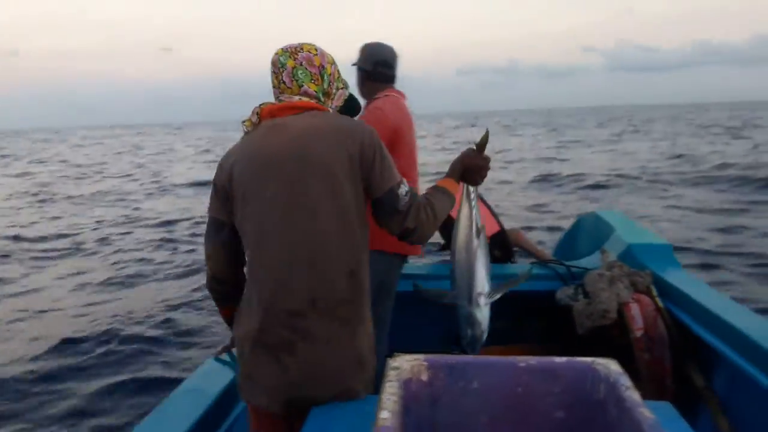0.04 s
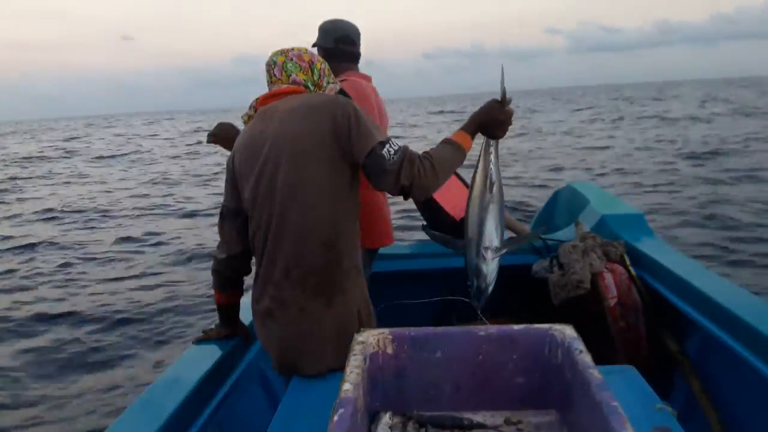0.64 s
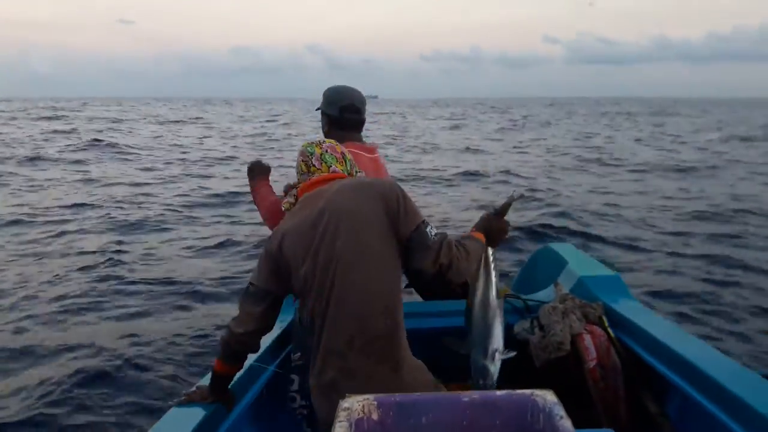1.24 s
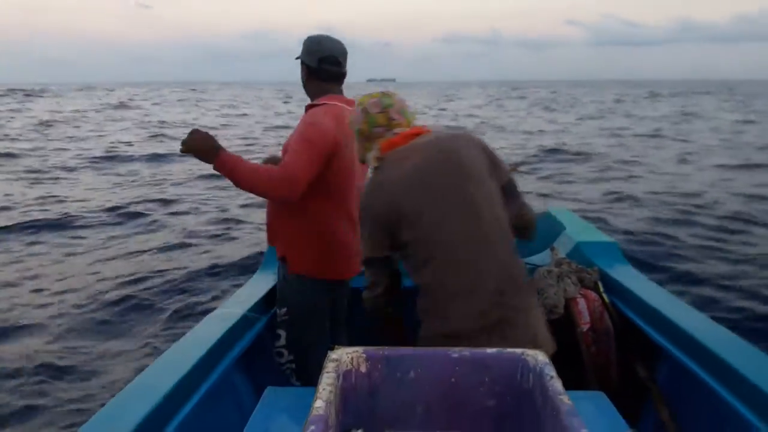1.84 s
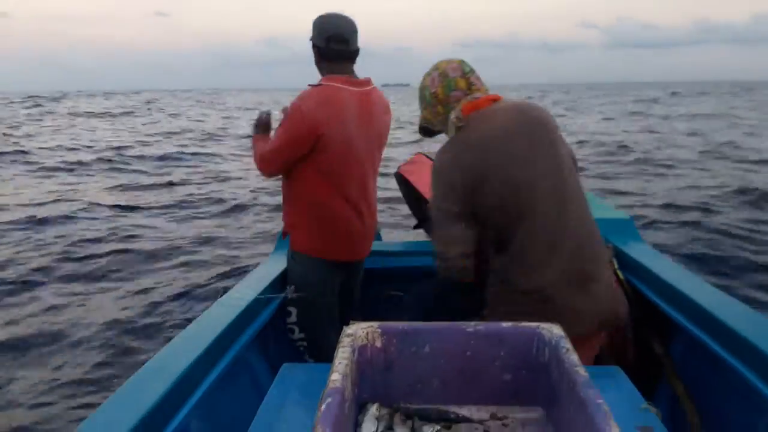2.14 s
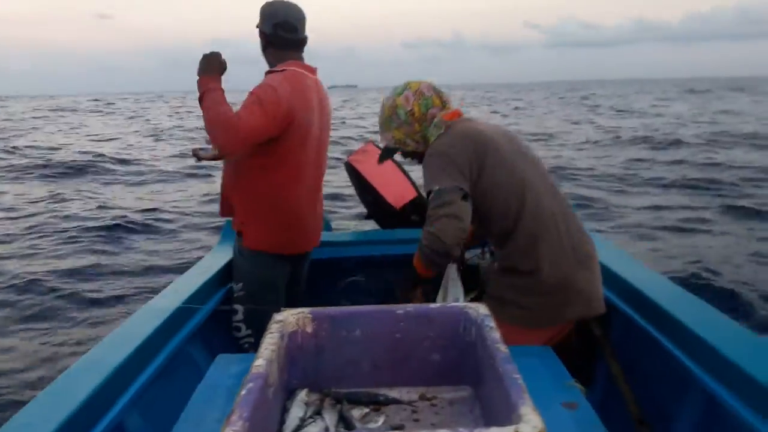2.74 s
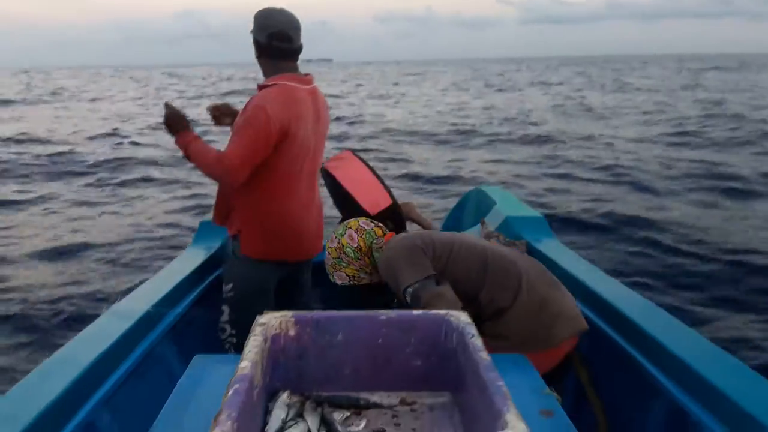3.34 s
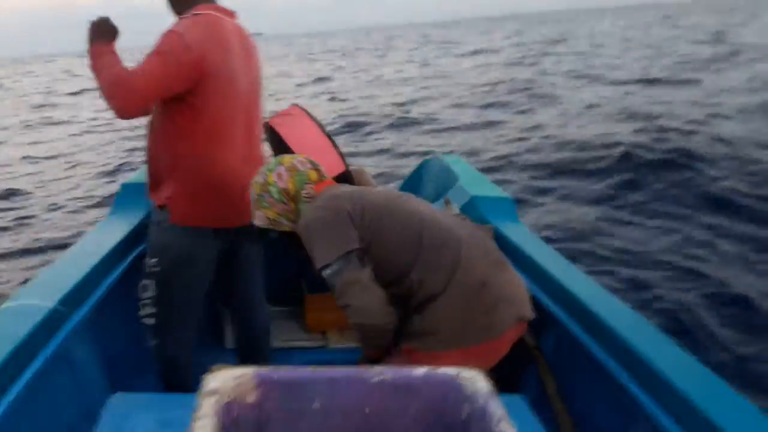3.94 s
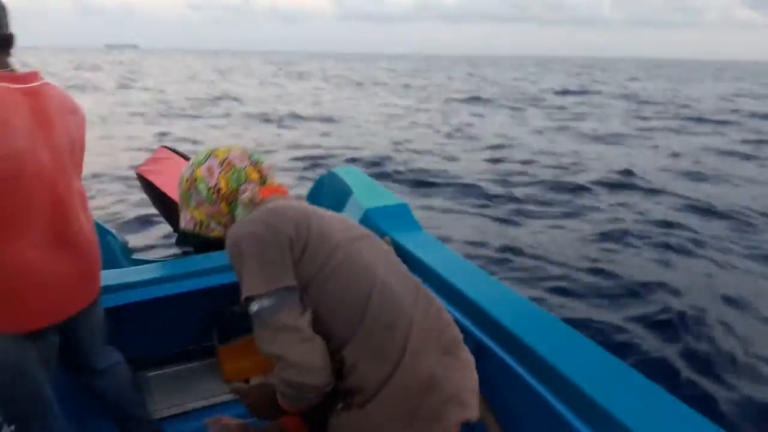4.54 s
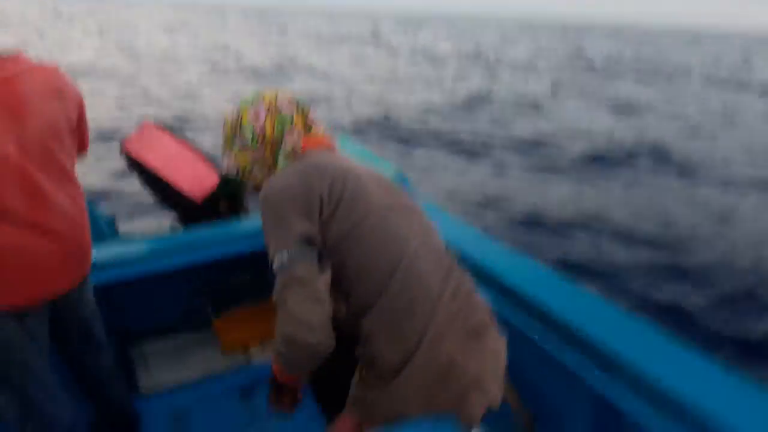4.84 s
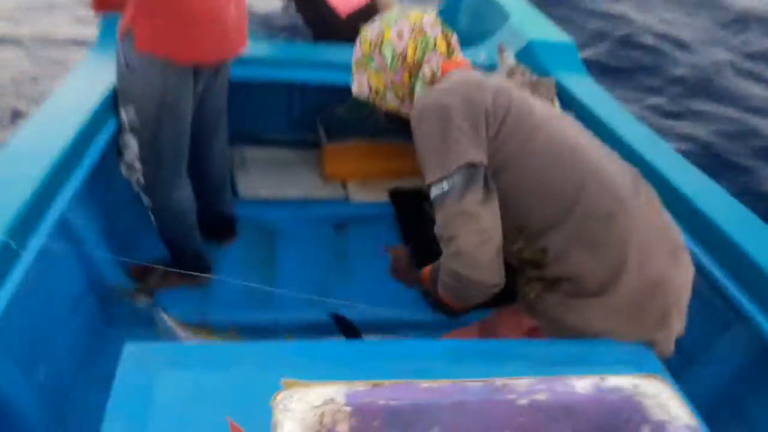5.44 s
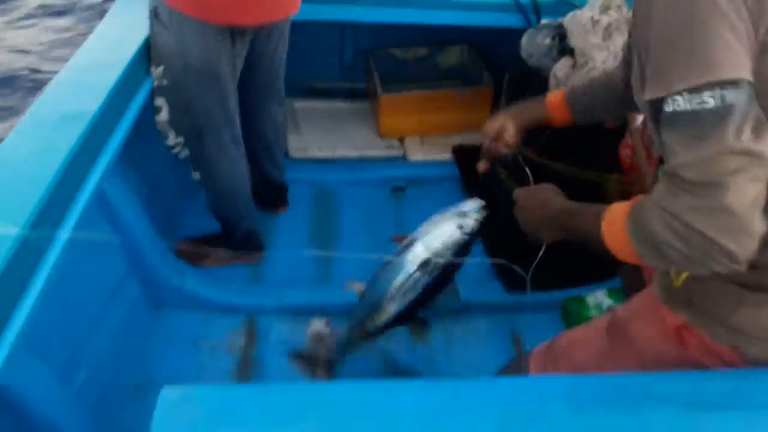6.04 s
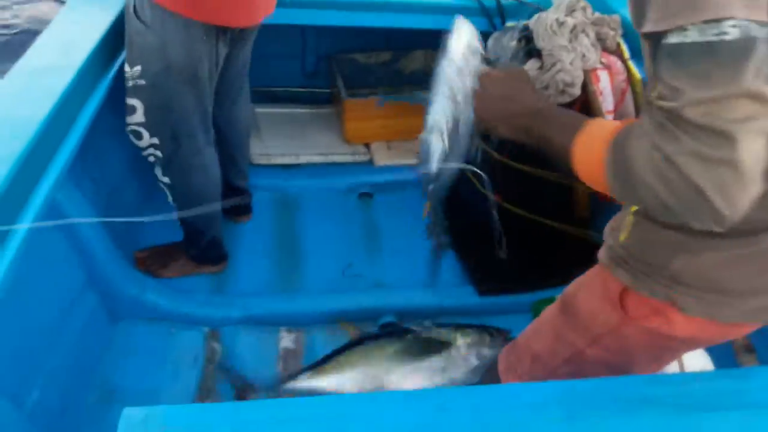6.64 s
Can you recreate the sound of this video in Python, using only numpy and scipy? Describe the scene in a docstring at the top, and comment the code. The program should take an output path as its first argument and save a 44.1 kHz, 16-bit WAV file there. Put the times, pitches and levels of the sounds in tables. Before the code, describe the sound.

Heard from inside a small boat, gusts of wind rumble over gentle sloshing and little bubbling plips. Feet and gear bump the hull now and then, among light wet pats. Past the midpoint the water washes louder and a landed fish thrashes on the floor nearby, its tail cracking in rapid, uneven wet slaps to the end. Its skin squeaks once against the deck.

```python
"""A freshly landed tuna thrashes on the wet fibreglass floor of a small open boat at sea.
Each tail impact cracks the water film and drives the deck; once, the skin squeaks by stick-slip friction.
Feet and gear knock on the hull, whose panels ring in their damped modes. Around the boat wind buffets
low, water sloshes, washes and fizzes along the side, and trapped air resonates in gulps and plips."""
import sys
import numpy as np
from scipy import signal
from scipy.fft import rfft, irfft, next_fast_len
from scipy.io import wavfile
from scipy.ndimage import uniform_filter1d

SR = 44100
rng = np.random.default_rng(int(sys.argv[2]) if len(sys.argv) > 2 else 0)


def generate_wav(sig):
    """Save sig (samples, or channels by samples) to the path in sys.argv[1] as 16-bit PCM at SR."""
    pcm = np.round(np.clip(np.atleast_2d(sig).T, -1, 1) * 32767).astype(np.int16)
    wavfile.write(sys.argv[1], SR, pcm)


N = 294317


def gain_of(db):
    """Amplitude ratio of a level in decibels."""
    return 10 ** (np.asarray(db) / 20)

def unit_rms(x):
    """Normalisation to rms 1."""
    return x / np.sqrt(np.mean(x ** 2) + 1e-20)

def envelope(curve):
    """A gain for every sample, interpolated in dB between (seconds, dB) points."""
    return gain_of(np.interp(np.arange(N) / SR, *np.transpose(curve)))

def spectrum_db(spectrum, hz):
    """A spectrum's level, interpolated along a logarithmic frequency axis."""
    corner_hz, db = np.transpose(spectrum)
    return np.interp(np.log(hz + 1), np.log(corner_hz + 1), db)

def add(mix, start_s, sound):
    """Superposition: a sound sums into the mix from its start time."""
    part = mix[max(round(start_s * SR), 0):][:len(sound)]
    part += sound[:len(part)]

def coloured(x, spectrum):
    """Filtering by multiplication of spectra; the result has rms 1."""
    n = next_fast_len(len(x), True)
    response = gain_of(spectrum_db(spectrum, np.fft.rfftfreq(n, 1 / SR)))
    return unit_rms(irfft(rfft(x, n) * response, n)[:len(x)])

def bell(detuning):
    """Lorentzian curve: 1 at the centre, one half at a detuning of 1."""
    return 1 / (1 + detuning ** 2)

def burst(noise, shape):
    """Amplitude-modulated noise carrying just the energy of its envelope."""
    return unit_rms(noise * shape) * np.sqrt(np.mean(shape ** 2))

def patchy_noise(spectrum, patch_db, flicker_db, patch_bins, patch_frames):
    """Random modulation in time and frequency breaks noise into short bright and dark patches."""
    hz = np.fft.rfftfreq(512, 1 / SR)
    real, imag, patches, flicker = rng.standard_normal((4, N // 128 + 5, len(hz)))
    for _ in range(2):
        patches = uniform_filter1d(uniform_filter1d(patches, patch_frames, 0), patch_bins, 1)
    flicker = uniform_filter1d(flicker[:, :1], patch_frames, 0)
    swing_db = patch_db * np.tanh(unit_rms(patches)) + flicker_db * np.tanh(unit_rms(flicker))
    frames = (real + 1j * imag) * gain_of(spectrum_db(spectrum, hz) + swing_db)
    return unit_rms(signal.istft(frames.T, nperseg=512, noverlap=384)[1][:N])

def boat_reverb(x, wet_db, t60):
    """Reflections between deck and sides: convolution with exponentially decaying noise."""
    t = np.arange(8000) / SR
    tail = rng.standard_normal(len(t)) * gain_of(-60 * t / t60) * (t > .0015)
    return x + gain_of(wet_db) * signal.oaconvolve(x, tail / np.linalg.norm(tail))[:len(x)]

def scattered_burst(noise, shape, wet_db, t60):
    """A burst feeds a diffuse field between deck and sides, whose energy decays exponentially."""
    retained = float(gain_of(-120 / (t60 * SR)))  # share of energy left after one sample
    tail = np.sqrt(signal.lfilter([1 - retained], [1, -retained], shape ** 2))
    return burst(noise, shape) + gain_of(wet_db) * burst(noise[::-1], tail)


# Spectrum of the buffeting. Each row: frequency in Hz, relative density in dB.
WIND_SPECTRUM = [(20, -74), (54, -5), (95, 1.5), (128, 3.5), (206, -4), (400, -26), (880, -120)]
# Strength of the gusts. Each row: time in seconds, level in dB.
WIND_LEVEL = [(0.0, -32), (0.03, -31.5), (0.89, -42.5), (1.14, -35), (1.22, -31.5), (1.49, -41.5),
              (2.95, -37.5), (3.16, -32.5), (4.4, -47.5), (4.55, -28.5), (4.6, -38.5), (4.75, -24),
              (4.9, -32), (5.39, -45), (5.72, -31), (6.26, -42), (6.32, -32.5), (6.56, -47.5), (6.67, -32)]

def wind():
    """Turbulent pressure fluctuations: low noise that swells with the gusts."""
    return envelope(WIND_LEVEL) * coloured(rng.standard_normal(N), WIND_SPECTRUM)


# Spectrum of the slosh. Each row: frequency in Hz, relative density in dB.
SLOSH_SPECTRUM = [(120, -1.5), (260, 5.5), (480, -1.5), (720, -10), (1400, -45.5)]
# Strength of the slosh. Each row: time in seconds, relative level in dB.
SLOSH_LEVEL = [(0.0, -42.5), (0.7, -48.5), (1.13, -44), (1.47, -49), (2.69, -51), (3.36, -43),
               (3.75, -53.5), (4.85, -36.5), (5.15, -34), (5.33, -46.5), (5.61, -37.5), (6.67, -48)]

def slosh():
    """Irregular motion of water under the hull modulates a low band of noise into lumps."""
    lumps = patchy_noise(SLOSH_SPECTRUM, patch_db=4, flicker_db=5, patch_bins=2, patch_frames=6)
    return gain_of(-1) * envelope(SLOSH_LEVEL) * lumps


# Spectrum of washing water. Each row: frequency in Hz, relative density in dB.
WASH_SPECTRUM = [(400, -7), (800, 10), (1300, 7), (2000, 3.5), (3200, -3), (6000, -21)]
# Strength of the flow along the hull. Each row: time in seconds, relative level in dB.
WASH_LEVEL = [(0.0, -61), (0.35, -59.5), (1.13, -53.5), (1.76, -61), (2.38, -52), (2.86, -57.5), (3.9, -54),
              (4.1, -43.5), (4.4, -49.5), (4.47, -36.5), (4.62, -41.5), (5.33, -51), (5.68, -40),
              (6.43, -58), (6.67, -54)]

def wash():
    """Flow noise and entrained bubbles rise and fall together as water runs along the hull."""
    flow = patchy_noise(WASH_SPECTRUM, patch_db=6, flicker_db=4, patch_bins=4, patch_frames=3)
    return envelope(WASH_LEVEL) * (gain_of(-1) * flow + gain_of(-7) * bubbles())

def bubbles(per_s=260, decay_cycles=5, low_hz=700, high_hz=5000, pitches=24):
    """Tiny bubbles arrive as a Poisson process, each a damped oscillator."""
    t, out = np.arange(1500) / SR, np.zeros(N)
    hz = np.geomspace(low_hz, high_hz, pitches)[rng.integers(0, pitches, N)]
    born = rng.random(N) < per_s / SR
    strength_db = 5 * np.minimum(rng.exponential(1, N), 3)
    for at in np.flatnonzero(born):
        cycles = hz[at] * t
        shape = (1 - np.exp(-cycles)) * np.exp(-cycles / decay_cycles)
        gain = gain_of(strength_db[at] - 4 * np.log2(hz[at]))
        add(out, at / SR, gain * shape * np.sin(2 * np.pi * cycles))
    return unit_rms(out)


# Spectra of the fizz and of fine spray. Each row: frequency in Hz, relative density in dB.
FIZZ_SPECTRUM = [(1200, 9.5), (2500, 7.5), (3700, 12.5), (5200, 10.5), (6900, 12), (7500, 9), (8100, -31),
                 (9500, 1.5), (11500, -14), (13200, -28), (16000, -33)]
SPRAY_SPECTRUM = [(6500, -48), (8100, -3.5), (9200, 5.5), (11000, 3.5), (12300, 1), (13200, -5),
                  (16000, -26)]
# Strength of the treble fizz. Each row: time in seconds, relative level in dB.
FIZZ_LEVEL = [(0.0, -58.5), (0.52, -62), (0.76, -64.5), (1.1, -55.5), (1.44, -56), (1.7, -62), (1.83, -62),
              (2.08, -55), (2.8, -60), (3.68, -49), (4.46, -56), (4.68, -42), (5.16, -48), (5.35, -45.5),
              (5.8, -44), (6.42, -45), (6.54, -68)]

def fizz(drops_per_s=120, foam_exponent=1.4):
    """Shot noise of droplets over a flickering hiss; foam grows by a power law, so louder is brighter."""
    hiss = patchy_noise(FIZZ_SPECTRUM, patch_db=-9.5, flicker_db=9, patch_bins=6, patch_frames=3)
    sizes = gain_of(5 * np.minimum(rng.exponential(1, N), 3)) * rng.choice([-1, 1], N)
    ticks = sizes * (rng.random(N) < drops_per_s / SR)
    drops = unit_rms(boat_reverb(coloured(ticks, FIZZ_SPECTRUM), wet_db=-2.5, t60=0.072))
    strength = envelope(FIZZ_LEVEL)
    foam_strength = strength.max() * (strength / strength.max()) ** foam_exponent
    foam = foam_strength * coloured(rng.standard_normal(N), SPRAY_SPECTRUM)
    return strength * (gain_of(-4) * hiss + gain_of(-7) * drops) + gain_of(-22) * foam


# Modes of the fibreglass panels. Each entry: natural frequency in Hz.
PANEL_MODES_HZ = [120, 175, 258, 340, 468, 572, 690, 808, 945, 1152, 1300, 1419, 1640, 1800, 2080]

def panel_modes(t, centre_hz, octaves):
    """Modal superposition: the modes nearest the centre frequency are excited most."""
    detuning = rng.standard_normal(len(PANEL_MODES_HZ)) / 100  # each spot is tuned a little differently
    hz = np.array(PANEL_MODES_HZ) * (1 + detuning)
    weight = bell(np.log2(hz / centre_hz) / octaves)
    modes = np.sin(2 * np.pi * (hz[:, None] * t + rng.random((len(hz), 1))))
    return weight / np.linalg.norm(weight) @ modes


# Broad resonances of the hull. Each row: frequency in Hz, width in Hz, relative peak in dB.
HULL_RESONANCES = [(263, 130, -6.5), (520, 180, -19), (805, 59, -22), (1107, 200, -14.5)]

def hull_ring(db, centre_hz, t60, rise_s, floor_db=-13, dull_hz=4500):
    """Free decay after a blow: distinct panel modes and the diffuse hull resonances near them."""
    t = np.arange(12000) / SR
    hz = np.fft.rfftfreq(len(t), 1 / SR)
    peaks = sum(gain_of(peak) * bell(2 * (hz - f) / width) for f, width, peak in HULL_RESONANCES)
    excitation = bell(np.log2((hz + 1) / centre_hz)) * bell(hz / dull_hz)
    diffuse = irfft(rfft(rng.standard_normal(len(t))) * (gain_of(floor_db) + peaks) * excitation)
    notes = panel_modes(t, centre_hz, octaves=0.22)
    shape = gain_of(db - 60 * t / t60) * (1 - np.exp(-t / rise_s))
    return gain_of(-8) * burst(diffuse, shape) + gain_of(-6) * shape * notes


# Blows of feet and gear. Each row: start in seconds, level in dB, centre of the ring in Hz,
# time to decay by 60 dB in seconds, boom in dB relative to the level.
HULL_KNOCKS = [(0.036, -26.5, 1070, 0.073, 1.5), (0.045, -28.5, 830, 0.035, -4),
               (0.229, -25.5, 600, 0.058, -8.5), (0.877, -30, 427, 0.16, -5), (1.268, -26, 580, 0.11, -7),
               (3.223, -29, 295, 0.32, -5), (3.623, -25.5, 820, 0.13, -22), (3.628, -30, 1440, 0.12, -25),
               (3.63, -22.5, 130, 0.16, -23), (3.741, -31.5, 825, 0.11, -14),
               (3.935, -24.5, 930, 0.095, -2), (4.003, -16, 1040, 0.045, -6.5), (4.035, -24, 805, 0.06, -5),
               (4.198, -26.5, 475, 0.17, -10), (4.415, -27.5, 950, 0.13, -3),
               (4.464, -12, 1070, 0.079, -11), (4.504, -21.5, 520, 0.23, -3.5),
               (4.734, -25.5, 587, 0.16, -5), (4.772, -21.5, 117, 0.36, -8.5),
               (5.661, -19.5, 460, 0.28, -5), (5.739, -19.5, 277, 0.13, -28),
               (5.917, -23.5, 520, 0.07, -19), (6.062, -25.5, 327, 0.079, -1),
               (6.263, -21.5, 565, 0.11, -12.5), (6.552, -17, 1360, 0.12, -17),
               (6.632, -22.5, 168, 0.28, -26)]

def knocks(boom_hz=317, boom_delay_s=0.01):
    """Impulse excitation: the struck panel rings, then the whole hull follows with a low boom."""
    out = np.zeros(N)
    for start, db, hz, t60, boom_db in HULL_KNOCKS:
        add(out, start, hull_ring(db, hz, t60, rise_s=0.00093))
        boom = hull_ring(db + boom_db, boom_hz * rng.uniform(0.735, 1.35), t60=0.24, rise_s=0.0024)
        add(out, start + boom_delay_s, boom)
    return out


# Spectra of the skin's crack and the deck's answer. Each row: frequency in Hz, relative density in dB.
CRACK_SPECTRUM = [(1200, -8.5), (2400, -17), (3000, -6), (3600, -1), (4300, -3.5), (5300, -5), (6500, 0),
                  (7300, 0), (8000, -26), (10000, -46)]
DECK_SPECTRUM = [(100, 3), (300, -10.5), (600, 11), (900, -7), (1350, 6.5), (2000, 3.5), (2800, 1.5),
                 (4500, -14.5)]

def slap(db, contact_s, spray_db, crack_hz, crack_octaves=0.33, usual_contact_s=0.0031, thud_hz=54.7):
    """Contact time sets an impact's timbre: a short one snaps, a long one pushes the deck harder."""
    n = np.arange(8192)
    t = n / SR
    progress = t / max(contact_s, .0004)
    force = progress * np.exp(1 - progress)
    doublings = np.log2(contact_s / usual_contact_s)
    skin, panel, drops, film = rng.standard_normal((4, len(t)))
    tearing = gain_of(3 * unit_rms(uniform_filter1d(film, size=24)))  # the water film breaks in spurts
    hz, density_db = np.transpose(CRACK_SPECTRUM)
    colour = np.c_[hz, density_db + 10 * np.log10(bell(np.log2(hz / crack_hz) / crack_octaves))]
    crack = scattered_burst(coloured(skin, colour) * tearing, force, wet_db=0.5, t60=0.12)
    spray = scattered_burst(coloured(drops, SPRAY_SPECTRUM) * tearing, force, wet_db=3.5, t60=0.11)
    click = coloured((n == 30) * 1., colour) * (n < 400)
    snap = gain_of(-8 - 8 * doublings) * click / click.max()
    deck = scattered_burst(coloured(panel, DECK_SPECTRUM), force, wet_db=4.5, t60=0.15)
    ring = gain_of(-21.5 - 60 * t / 0.073) * panel_modes(t, centre_hz=1400, octaves=1)
    # the floor flexes under the weight of the fish
    thud = gain_of(-22.5 - 60 * t / 0.87) * (1 - t / t[-1]) * np.sin(2 * np.pi * thud_hz * t)
    from_skin = gain_of(-1.5) * crack + gain_of(spray_db - 4) * spray + snap
    from_floor = gain_of(-13.5 + 8 * doublings) * deck + ring + thud
    return gain_of(db) * (from_skin + from_floor)


# Wet slaps, from handling to full tail beats. Each row: start in seconds, level in dB,
# contact time in seconds, relative spray level in dB, centre of the crack in Hz.
FISH_SLAPS = [(0.102, -37.5, 0.0023, -14, 3600), (0.123, -33.5, 0.0019, -20, 3760),
              (0.546, -43, 0.0034, -15, 4500), (1.177, -40.5, 0.00043, -30, 6500),
              (1.568, -45, 0.0015, -12, 6300), (1.859, -42, 0.0042, -12, 6100),
              (1.9598, -42.5, 0.00089, -11, 7040), (2.556, -39, 0.00097, -20, 3470),
              (3.396, -41.5, 0.0034, -16, 5500), (3.565, -31, 0.003, -12, 5700),
              (3.741, -40, 0.0018, -7, 5460), (3.785, -35, 0.0046, -10, 4870),
              (3.92, -36.5, 0.0059, -20, 4400), (4.465, -26, 0.00095, -18, 2180),
              (4.49, -22.5, 0.0039, -16, 5350), (4.5863, -33.5, 0.0033, -13, 5000),
              (4.73, -36.5, 0.0077, -10.5, 5250), (4.925, -34, 0.0028, -10, 5570),
              (4.9532, -20, 0.00078, -10, 6250), (5.159, -23, 0.0028, -13.5, 5150),
              (5.3847, -14.5, 0.00062, -19, 5100), (5.455, -32, 0.0019, -18, 5500),
              (5.473, -30, 0.0038, -21, 3800), (5.481, -21, 0.0016, -18, 5340),
              (5.565, -19.5, 0.001, -5, 6600), (5.616, -10.5, 0.0015, -13.5, 5250),
              (5.657, -21.5, 0.0032, -12, 5650), (5.7124, -13.5, 0.0013, -8.5, 6900),
              (5.724, -22, 0.0011, -24, 6270), (5.78, -23, 0.0015, -13, 5900),
              (5.8086, -18, 0.00034, -24, 3940), (5.8123, -13, 0.00046, -8.5, 6170),
              (5.8597, -11.5, 0.00085, -9.5, 5260), (5.906, -25, 0.0026, -13.5, 5900),
              (5.9865, -27, 0.0016, -14.5, 5600), (6.103, -29.5, 0.0036, -16, 5630),
              (6.1208, -25.5, 0.0036, -16.5, 6040), (6.1673, -28, 0.00098, -13, 5400),
              (6.1985, -23.5, 0.00044, -12, 6400), (6.207, -21, 0.00061, -22, 6300),
              (6.222, -28, 0.00064, -12, 4500), (6.4043, -15, 0.0018, -22, 6700),
              (6.459, -29.5, 0.0026, -13, 4930), (6.5507, -15, 0.0023, -14, 5050),
              (6.6064, -15.5, 0.0033, -12.5, 5170), (6.627, -19, 0.0021, -13, 3770),
              (6.6564, -23.5, 0.00089, -8, 6200)]

def thrashing(rebound_s=0.02, rebound_db=-24):
    """Inelastic collision: the fish hits the deck, and each beat has one much softer rebound."""
    out = np.zeros(N)
    for start, db, contact_s, spray_db, hz in FISH_SLAPS:
        add(out, start, slap(db, contact_s, spray_db, hz))
        delay = rebound_s * rng.uniform(0.54, 1.2)
        add(out, start + delay, slap(db + rebound_db, contact_s, spray_db, hz))
    return out

def pats(per_s=14, contact_s=0.00096, low_hz=3600, high_hz=7500, octaves=0.165):
    """Light wet impacts at random moments: band-limited bursts whose level follows the fizz."""
    t, out = np.arange(2048) / SR, np.zeros(N)
    hz = np.fft.rfftfreq(len(t), 1 / SR)
    force = t / contact_s * np.exp(1 - t / contact_s)
    for when, size, pitch in rng.random((round(per_s * N / SR), 3)):
        centre_hz = low_hz + (high_hz - low_hz) * pitch
        band = bell(np.log2((hz + 1) / centre_hz) / octaves)
        skin = irfft(rfft(rng.standard_normal(len(t))) * band)
        add(out, when * N / SR, burst(skin, gain_of(1.5 + 12 * size ** 2) * force))
    return boat_reverb(envelope(FIZZ_LEVEL) * out, wet_db=-2.5, t60=0.16)


def air_pocket(db, hz, rise_cycles=2, flutter=0.1):
    """Bubble resonance, wobbling as water closes over it; small pockets die sooner and splash more."""
    t = np.arange(9000) / SR
    surface, spray = rng.standard_normal((2, len(t)))
    cycles = np.cumsum(hz * (1 + flutter * unit_rms(uniform_filter1d(surface, 120)))) / SR
    t60 = 0.079 * (1000 / hz) ** 0.81
    shape = gain_of(db + 1 - 60 * t / t60) * (1 - np.exp(-t * hz / rise_cycles))
    splash = gain_of(-18 + 6 * min(np.log2(hz / 1000), 1)) * coloured(spray, WASH_SPECTRUM)
    return shape * (np.sin(2 * np.pi * cycles) + splash)


# Air trapped under and beside the hull. Each row: start in seconds, level in dB, pitch in Hz.
TRAPPED_AIR = [(0.124, -31, 401), (0.77, -41, 2230), (0.772, -43.5, 1184), (0.849, -45, 2080),
               (0.954, -37.5, 2490), (1.239, -39.5, 1890), (1.504, -43, 1590), (1.72, -46.5, 2570),
               (2.437, -31, 504), (2.609, -29.5, 1895), (2.849, -22.5, 396), (3.003, -38.5, 2140),
               (3.111, -39.5, 4520), (5.43, -29.5, 389), (6.236, -33.5, 1640)]

def gulps(fragments=3, gurgle_db=-9, spacing_s=0.016):
    """Bubble break-up: each pocket of air rings, then gurgles into fainter bubbles of nearby pitch."""
    out = np.zeros(N)
    for start, db, hz in TRAPPED_AIR:
        add(out, start, air_pocket(db, hz))
        for k, (late, pitch) in enumerate(rng.random((fragments, 2)), 1):
            fragment = air_pocket(db + gurgle_db * (1 + k / 2), hz * 2 ** (pitch - .5))
            add(out, start + spacing_s * (k + late - .5), fragment)
    return boat_reverb(out, wet_db=-0.5, t60=0.079)

def plips(per_s=11, db=-39, low_hz=600, high_hz=3200):
    """Small bubbles resonate at random moments beside the hull, the higher ones more faintly."""
    out = np.zeros(N)
    for when, faintness, pitch in rng.random((round(per_s * N / SR), 3)):
        hz = low_hz * (high_hz / low_hz) ** pitch
        add(out, when * N / SR, air_pocket(db - 10 * (faintness + pitch), hz))
    return out


# Small waves against the side. Each row: time of the crest in seconds, level in dB, half length in seconds.
WAVE_CRESTS = [(0.904, -54.5, 0.058), (4.172, -41, 0.0077), (4.214, -43, 0.046)]

def swishes():
    """A passing wave radiates broadband hiss that swells and sinks under a Gaussian envelope."""
    t = np.arange(N) / SR
    swell = sum(gain_of(db) * np.exp(-((t - crest) / half) ** 2) for crest, db, half in WAVE_CRESTS)
    flow = coloured(rng.standard_normal(N), WASH_SPECTRUM)
    hiss = coloured(rng.standard_normal(N), FIZZ_SPECTRUM)
    return swell * unit_rms(flow + hiss)


# Course of the squeak. Each row: time in seconds, pitch in Hz, level in dB, overtone tilt in dB per octave.
SQUEAK_PATH = [(6.263, 1136, -37, 1), (6.269, 1410, -20.5, -6), (6.273, 1408, -19, 5.5),
               (6.277, 1254, -14.5, -5), (6.294, 1402, -28.5, -14), (6.309, 1400, -51, -2),
               (6.318, 1456, -30.5, -13), (6.327, 1400, -54, -12)]
# Partials of the squeak. Each row: harmonic number, relative level in dB.
SQUEAK_HARMONICS = [(1, -3.5), (2, -7.5), (3, -5.5), (4, -6.5), (5, -5)]

def squeak(jitter=0.024, rub_db=-11):
    """Stick-slip of wet skin on the deck: a shrill catch that dips, then a note that rises as it dies."""
    times, *columns = np.transpose(SQUEAK_PATH)
    t = np.arange(times[0], times[-1], 1 / SR)
    hz, level_db, tilt_db = (np.interp(t, times, column) for column in columns)
    waver = jitter * unit_rms(uniform_filter1d(rng.standard_normal(len(t)), 30))
    cycles = np.cumsum(hz * (1 + waver)) / SR
    tone = sum(gain_of(db + tilt_db * np.log2(k)) * np.sin(2 * np.pi * (k * cycles + rng.random()))
               for k, db in SQUEAK_HARMONICS)
    rub = gain_of(rub_db) * coloured(rng.standard_normal(len(t)), WASH_SPECTRUM)
    out = np.zeros(N)
    add(out, times[0], gain_of(level_db) * (tone + rub))
    return boat_reverb(out, wet_db=-5, t60=0.08)


def scene():
    """Linear superposition of all sources in the middle of the boat, in one channel."""
    events = thrashing() + pats() + knocks() + gulps() + plips() + squeak() + swishes()
    return (events + wind() + slosh() + wash() + fizz())[None]

def record(dry, ceiling=0.9, cutoff_hz=16200):
    """Soft saturation rounds the highest peaks; a low-pass filter then limits the band."""
    rounded = dry / (1 + (dry / ceiling) ** 8) ** (1 / 8)
    lowpass = signal.firwin(255, cutoff_hz, window=("kaiser", 9), fs=SR)
    return signal.oaconvolve(rounded, lowpass[None], "same")


dry = scene()
out = record(dry)
generate_wav(out)
```